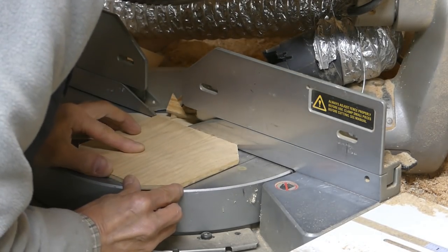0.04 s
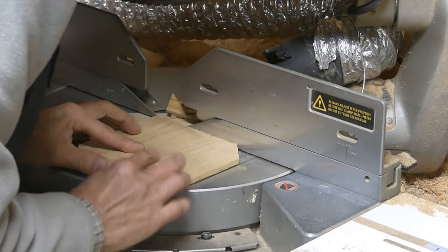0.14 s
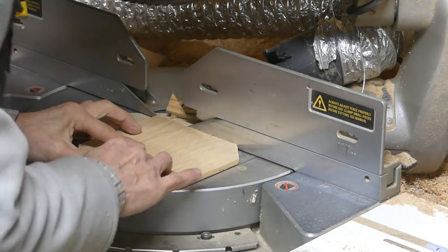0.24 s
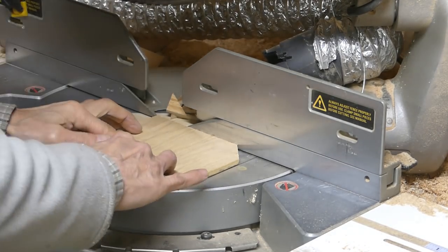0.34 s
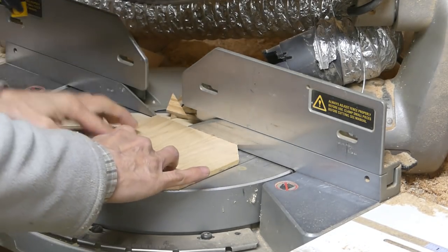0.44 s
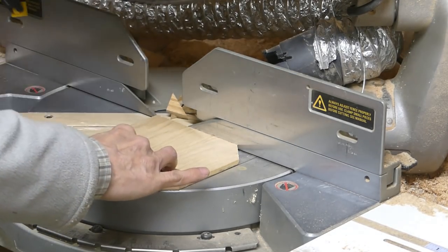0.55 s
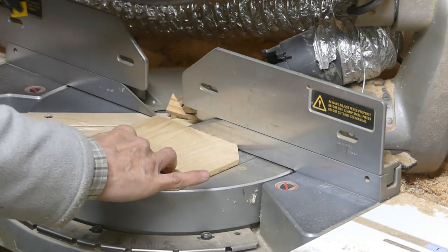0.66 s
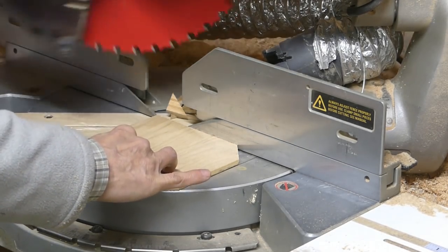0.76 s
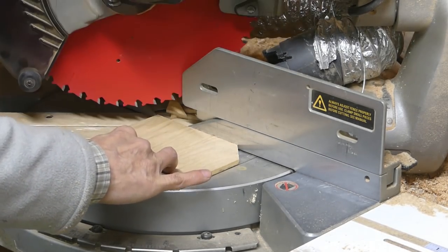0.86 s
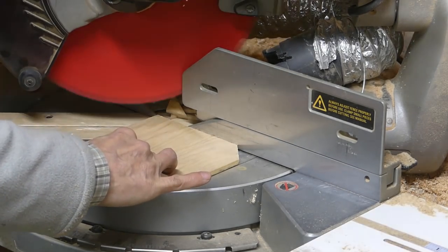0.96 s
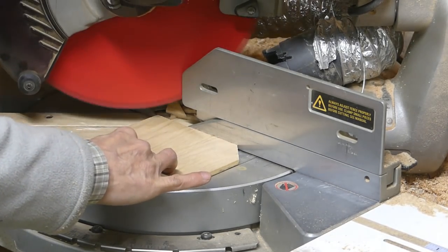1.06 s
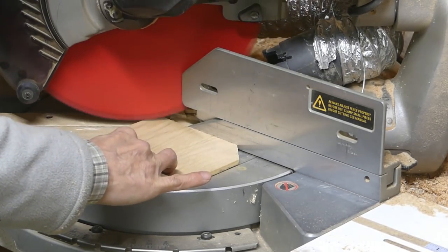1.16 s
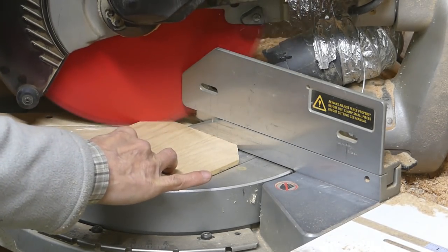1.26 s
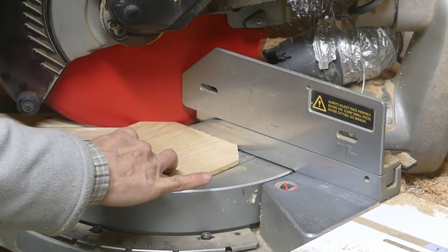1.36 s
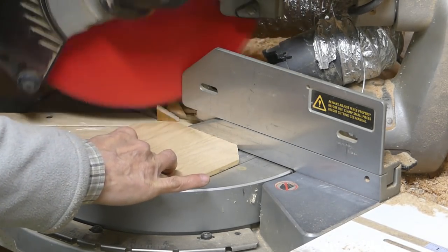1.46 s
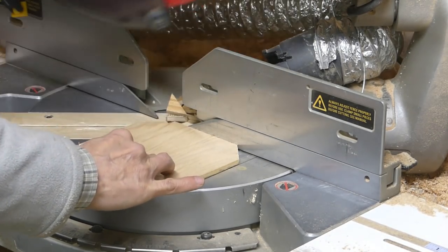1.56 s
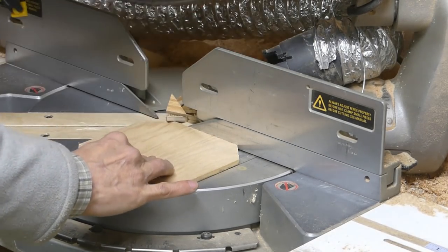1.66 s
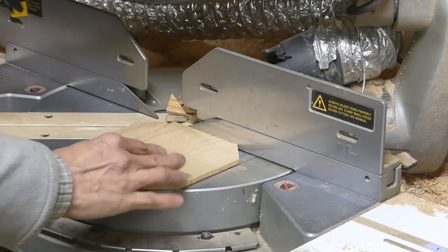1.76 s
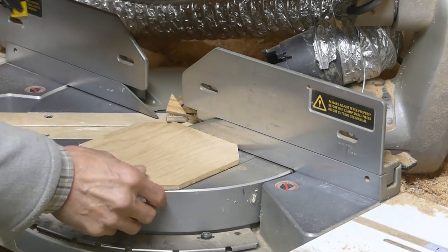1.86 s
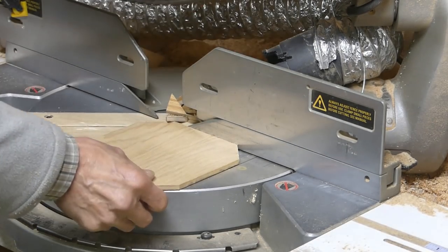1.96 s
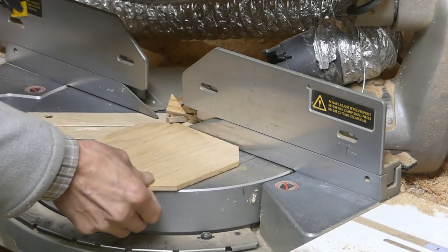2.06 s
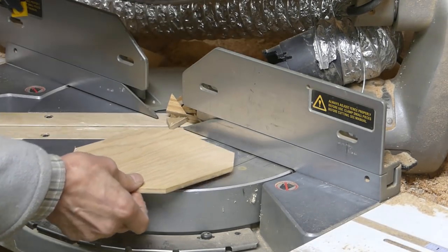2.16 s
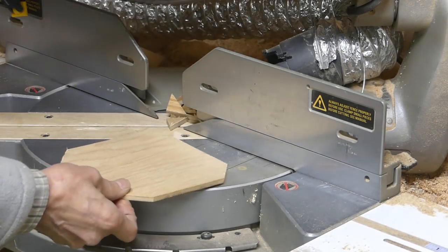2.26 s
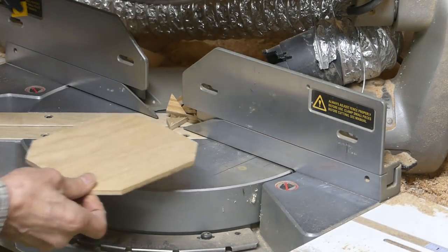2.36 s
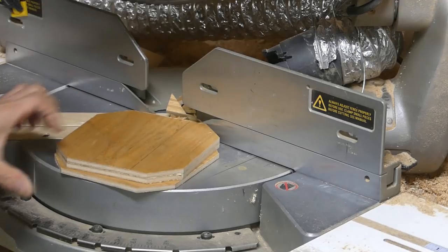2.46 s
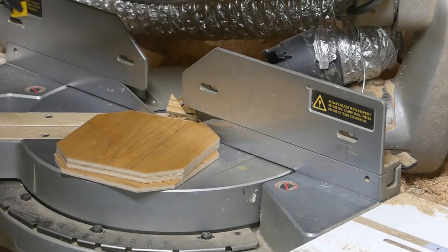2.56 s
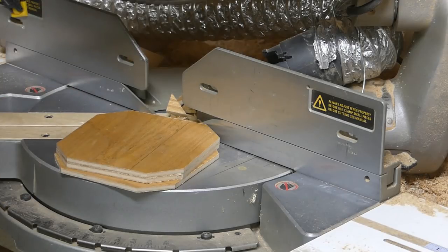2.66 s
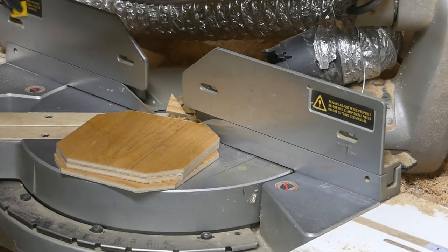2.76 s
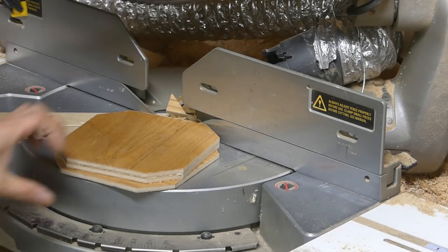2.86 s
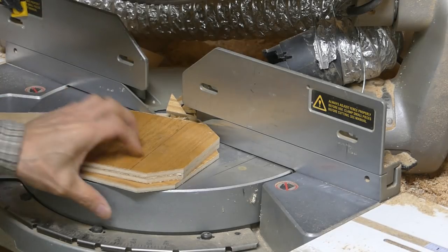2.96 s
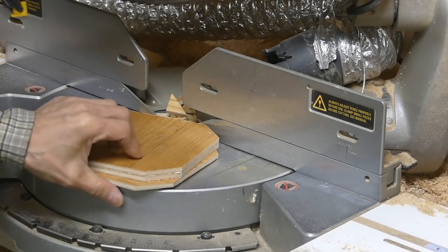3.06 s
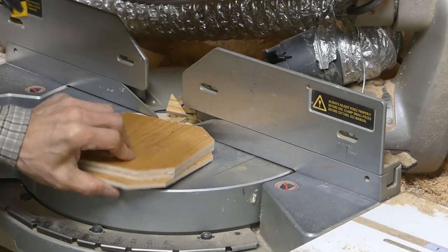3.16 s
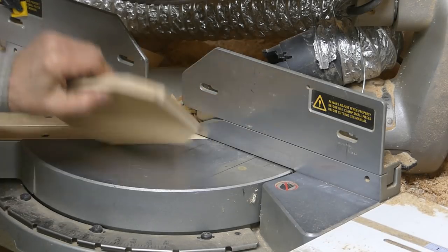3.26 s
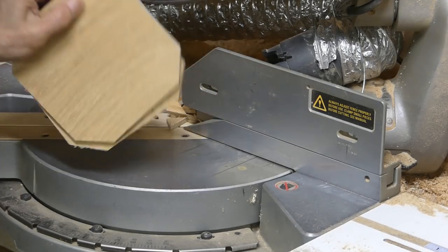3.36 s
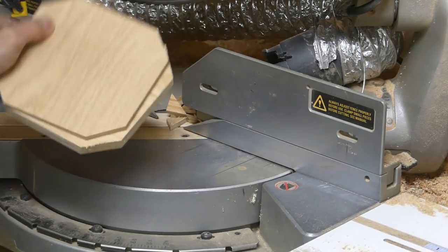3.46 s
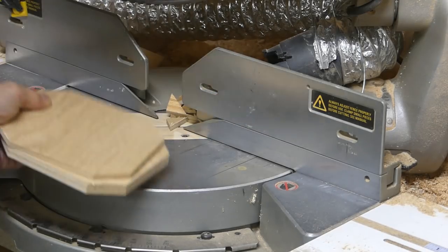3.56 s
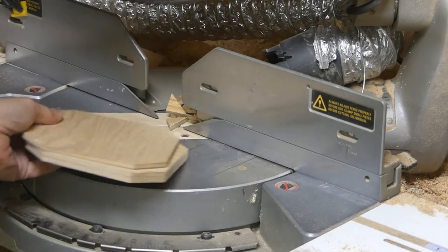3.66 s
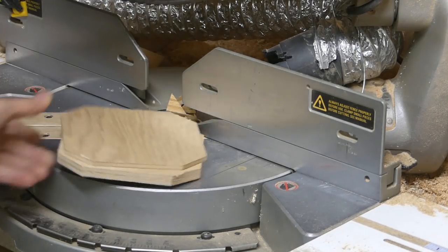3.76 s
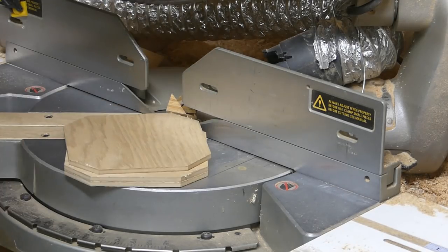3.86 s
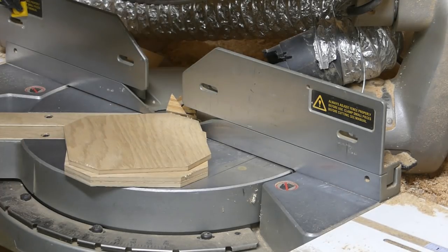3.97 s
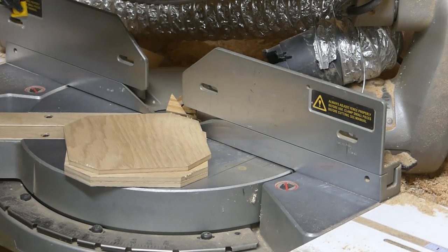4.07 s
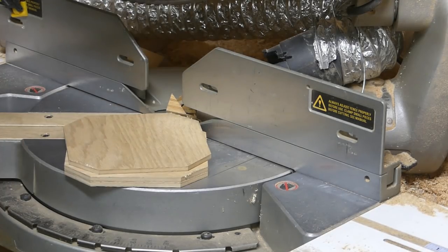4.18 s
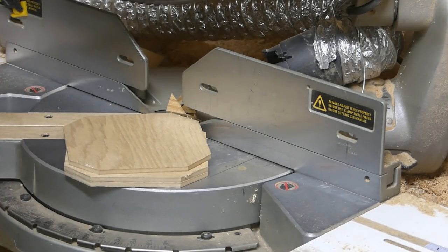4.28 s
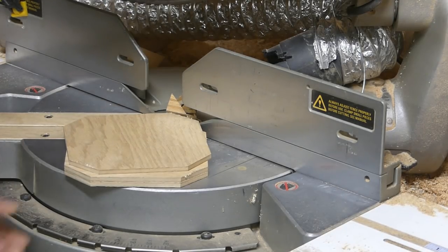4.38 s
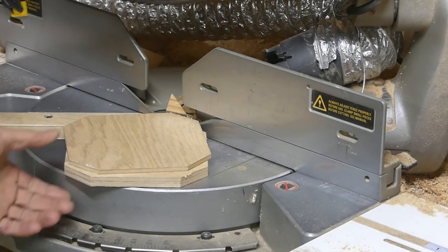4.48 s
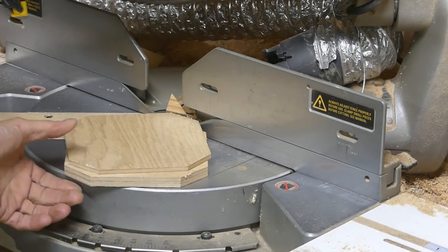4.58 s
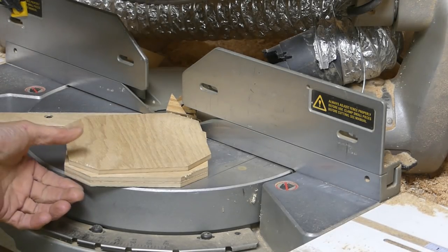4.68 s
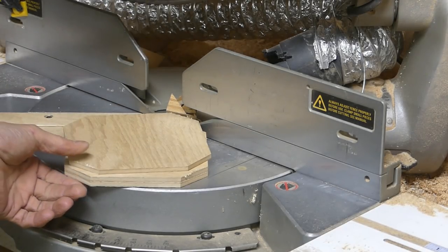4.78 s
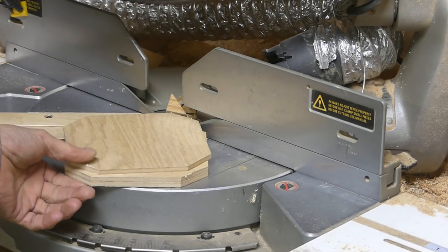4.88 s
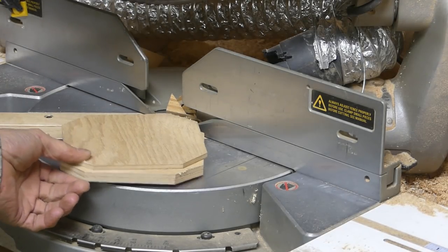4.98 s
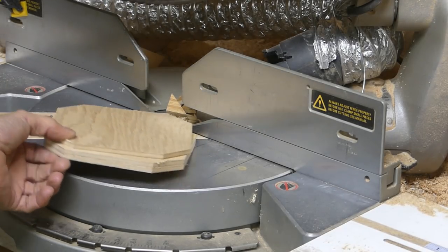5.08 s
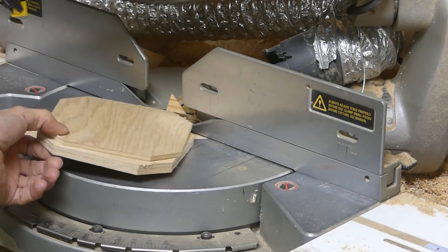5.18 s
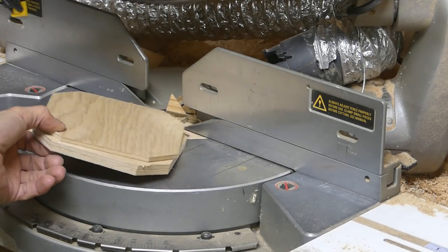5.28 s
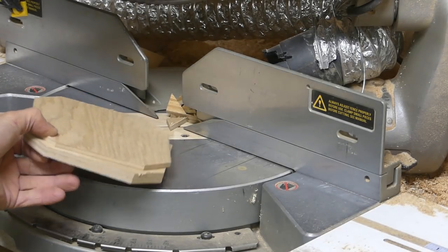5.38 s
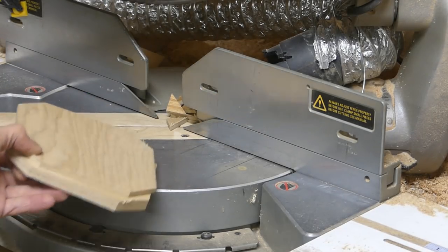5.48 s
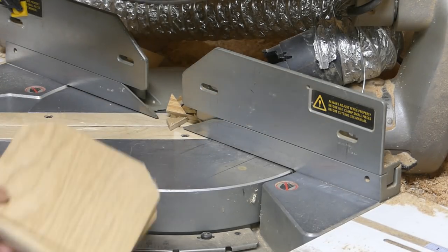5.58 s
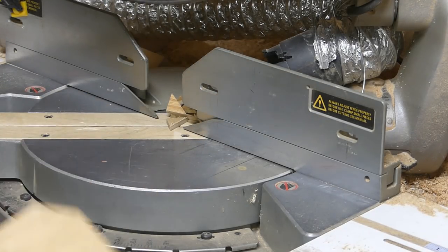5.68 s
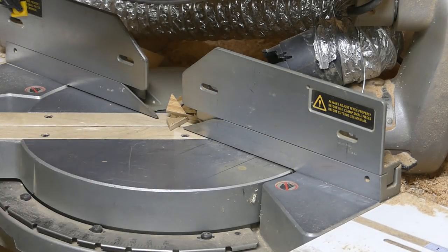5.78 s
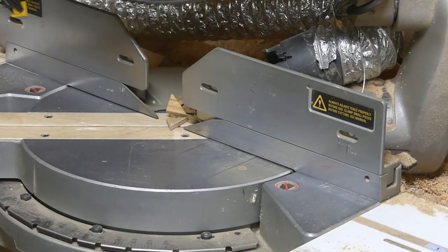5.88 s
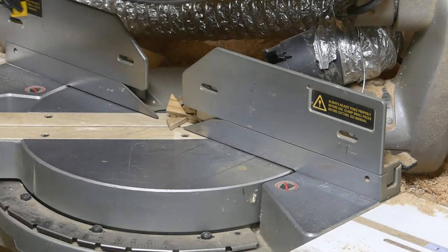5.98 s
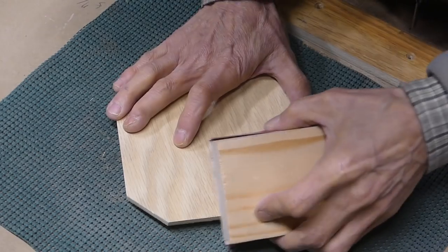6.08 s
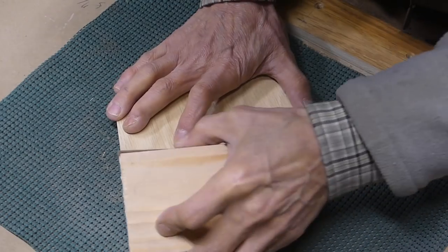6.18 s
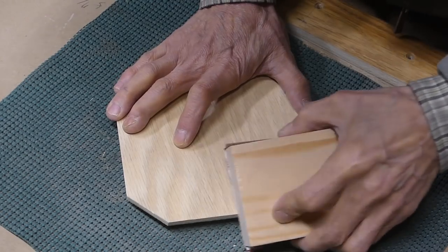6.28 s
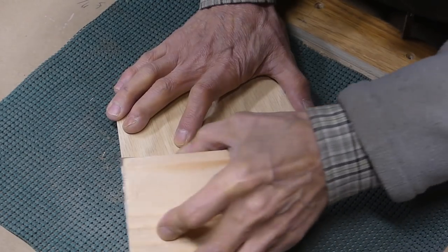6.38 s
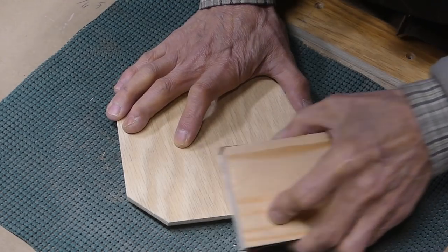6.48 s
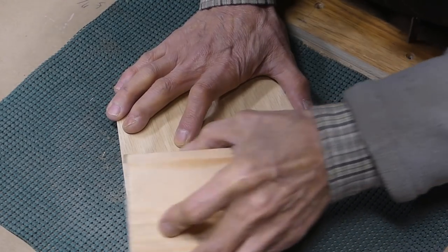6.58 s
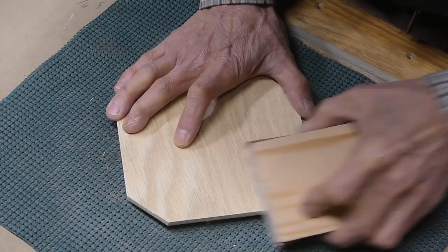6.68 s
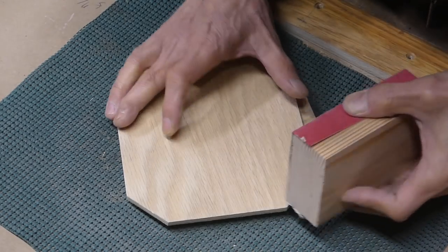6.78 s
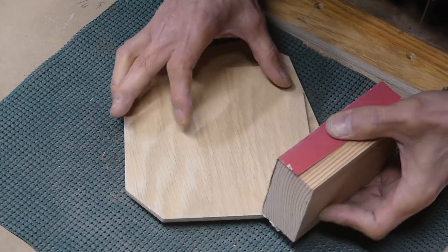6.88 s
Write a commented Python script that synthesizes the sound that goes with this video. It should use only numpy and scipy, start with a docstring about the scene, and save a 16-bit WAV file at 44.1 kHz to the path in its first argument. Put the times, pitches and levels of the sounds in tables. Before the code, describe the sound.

Close in a small workshop, a miter saw whines steadily beside a rushing extractor, then chews a plywood corner with gritty chip noise, a climbing and falling whistle and brief squeals. It lifts and breaks off abruptly. Panels clack onto the metal table, one scrapes, more knock down sharply. Quiet handling follows, then a soft thud and six fast, dry sanding strokes.

```python
"""A miter saw whines (shaft orders) beside its extractor (coloured noise and duct hums), cuts a plywood
panel's corner (grainy chip noise, depth-tuned whistle, squeals) and lifts; its sound breaks off.
Panels drop and slide on the saw's metal table: noise bursts, decaying modes and rough drag noise.
Last, a sanding block rubs a panel's edge in six quick strokes of grainy noise.
Soft brushes of hands on wood and the noise of an idle workshop lie beneath."""
import sys
import numpy as np
from scipy import signal
from scipy.fft import rfft, irfft, next_fast_len
from scipy.io import wavfile
from scipy.ndimage import uniform_filter1d, map_coordinates

SR = 44100
rng = np.random.default_rng(int(sys.argv[2]) if len(sys.argv) > 2 else 0)


def transcribe(signal):
    """Save signal, clipped to [-1, 1], as a 16-bit WAV file at the path in sys.argv[1]."""
    frames = np.atleast_2d(signal).T
    limited = np.clip(frames, -1, 1)
    pcm = np.round(limited * 32767).astype(np.int16)
    wavfile.write(sys.argv[1], SR, pcm)


N = 306054
TOP_HZ = 15800

# idle workshop spectrum: hz, relative_db_per_hz
QUIET_SPECTRUM = [(25, -32), (50, -22), (85, -12.5), (160, -6), (300, -7), (480, -8.5), (750, -8.5),
                  (1300, -9.5), (1900, -16), (2500, -23), (4500, -26), (7500, -28), (10500, -27),
                  (15800, -34)]
# left-right correlation of diffuse sound: hz, correlation
STEREO_LIKENESS = [(30, 0.18), (70, 0.25), (130, 0.48), (500, 0.61), (1000, 0.69), (2500, 0.74),
                   (12000, 0.83)]
# wall reverberation: hz, t60_s
WALLS = [(100, 0.88), (400, 0.48), (1500, 0.38), (4000, 0.37), (8000, 0.3), (14000, 0.3)]

# hand and sleeve brushing wood: centre_s, sigma_s, level_db
BRUSHES = [(3.057, 0.022, -54.5), (3.152, 0.023, -50.5), (3.812, 0.081, -43.5), (4.047, 0.048, -55),
           (5.073, 0.015, -58), (5.4, 0.045, -50), (5.521, 0.042, -49), (5.96, 0.02, -49),
           (6.046, 0.028, -47), (6.927, 0.033, -54.5)]
# panel dragged over the table: fastest_s, level_db
DRAGS = [(3.308, -26.5), (5.089, -47)]
# dragged wood spectrum: hz, relative_db_per_hz
SCRAPE_SPECTRUM = [(100, -19), (450, -13.5), (800, 0.5), (1300, 2.5), (2000, -2), (3500, -8), (6000, -11),
                   (11000, -18.5), (15800, -30)]
DRAG_RISE_DB_PER_S, DRAG_FALL_DB_PER_S = 300, 295

# panel put down on the mat, then its corner bumped by the block: start_s, level_db
THUDS = [(6.006, -29), (6.672, -46)]
# modes of the panel damped by a rubber mat: hz, relative_db, t60_s
MAT_MODES = [(162, -4, 0.12), (198, 4, 0.13), (236, 0, 0.12), (285, 0.5, 0.13)]
TICK_S = 6.865

# sanding strokes: centre_s, half_length_s (scaled per layer), rasp_db
STROKES = [(6.19, 0.039, -28), (6.31, 0.028, -26.5), (6.414, 0.031, -25), (6.522, .036, -25),
           (6.626, 0.026, -26), (6.718, 0.037, -24.5)]
# abrasive grit spectrum: hz, relative_db_per_hz
GRIT_SPECTRUM = [(100, -53), (500, -21), (1000, -13), (1500, -10), (2300, -3), (3000, 3), (3800, -1),
                 (5000, 0), (7000, -3.5), (9500, -6), (13000, -10), (15800, -16)]
# hollow scrape spectrum: hz, relative_db_per_hz
HOLLOW_SPECTRUM = [(80, -51), (230, -3), (400, -10), (800, -1.5), (1400, 0.5), (2000, 3), (4000, -32),
                   (15800, -43)]
# hollow level relative to the rasp; fades as the block moves out to the corner
HOLLOW_DB, HOLLOW_FADE_DB_PER_S = -10.5, 41

# wood meeting the table: start_s, clack_db, table_db, panel_ring_db, panel_pitch_ratio
KNOCKS = [(2.4887, -10.5, -21, -23, 0.95), (2.4964, -17, -18, -22, 1), (3.311, -20.5, -36, -38.5, 1),
          (3.6558, -19, -32, -34, 0.93), (3.7391, -17.5, -31.5, -38, 1), (3.746, -16.5, -43, -34, 0.91),
          (3.8431, -13, -20, -25, 1.08), (3.8495, -5.5, -19.5, -32, 1.46), (3.868, -40, -24, -28, 1.8),
          (3.917, -32, -24, -32.5, 1.46), (4.578, -53, -46, -53, 0.9), (4.903, -62, -52, -55, 0.9)]
# panel modes: hz (before pitch ratio), relative_db, t60_s
PANEL_MODES = [(237, -4, 0.25), (270.2, -6.5, 0.33), (375.5, 0, 0.39), (446, -3, 0.31), (563, -14, 0.081),
               (664, -16.5, 0.75), (874, -17, 0.075), (1285, -18, 0.1), (1500, -12, 0.41), (1760, -4, 0.09),
               (1930, -2, 0.15)]
# contact clack spectrum: hz, relative_db_per_hz
CLACK_SPECTRUM = [(100, -6), (400, -39), (900, 0), (1500, 2), (2400, 4), (4000, 1.5), (6500, -6),
                  (10000, -7), (15800, -17)]
# table's crowded low modes as a spectrum: hz, relative_db_per_hz
TABLE_SPECTRUM = [(40, -30), (120, -10.5), (250, -2), (400, 3), (700, -1), (1100, -1), (2000, -11.5),
                  (6000, -57)]
# treble edge of a 0 dB clack; weaker blows are duller
CONTACT_HZ, BRIGHTEN_DB_PER_OCTAVE = 7500, 19

# extractor duct tones: hz, relative_db, width_hz
DUCT_TONES = [(557, -38.5, 43), (622.6, -33.5, 24), (802, -39, 16), (873, -40.5, 25), (1393, -36, 25)]
# fan and extractor rush spectrum: hz, relative_db_per_hz
RUSH_SPECTRUM = [(30, -42), (90, -49), (170, -15), (245, -7.5), (320, -7.5), (450, -1.5), (620, 0),
                 (1000, 3.5), (1400, 4.5), (1750, -6), (2050, -1), (2800, -6.5), (5000, -21), (15000, -45)]
# spinning teeth hiss spectrum: hz, relative_db_per_hz
HISS_SPECTRUM = [(500, -42), (2000, -19), (3200, 6.5), (4700, -1), (7000, 2.5), (9300, 2.5), (12500, -1),
                 (15800, -7)]
# blade resonances: hz, width_hz, relative_db
BLADE_MODES = [(5670, 190, 1), (8950, 260, -17), (9390, 360, 2), (10730, 370, -0.5), (11520, 300, -1),
               (13080, 220, -8)]
# chip spectrum: hz, relative_db_per_hz
CHIP_SPECTRUM = [(40, -44), (130, -56), (300, -11.5), (600, -6), (1200, 4.5), (2200, 4.5), (4000, 1),
                 (6500, -1), (9000, -11), (11500, -7), (14000, -5.5), (15800, -9)]
# teeth catching on an edge or loose chip: centre_s, sigma_s, level_db
CATCHES = [(0.848, 0.023, -24.5), (1.006, 0.0033, -17), (1.077, 0.016, -23), (1.662, .012, -20),
           (1.834, 0.01, -33)]
# blade squeals: centre_s, sigma_s, pitch_hz, level_db, overtone_step_db
SQUEALS = [(1.298, 0.014, 3760, -22, -0.5), (1.334, 0.01, 3910, -30, 3.5), (1.5, 0.056, 1146, -27.5, -30),
           (1.668, 0.0052, 1197, -13.5, -27), (1.881, 0.17, 11030, -36.5, -57),
           (2.33, 0.0026, 6110, -24.5, -4), (2.375, 0.011, 2046, -26, -26), (2.459, 0.018, 1203, -21, -18)]
# motor harmonics: shaft_rate_multiple, relative_db
SHAFT_ORDERS = [(1, -24.5), (2, -16), (3, 0.5), (4, -12.5), (5, -11), (6, -0.5), (7, -18.5), (8, -18),
                (9, -25.5), (10, -19.5), (13, -21), (15, -23), (33, -24), (36, -21.5), (54, -19)]
# blade in the panel: time_s, depth_0_to_1
DEPTH = [(0.97, 0.01), (1.05, 0.21), (1.18, 0.61), (1.4, 0.94), (1.55, 1), (1.66, .55), (1.82, 0.14),
         (1.97, 0.02)]
# running machine level, dipping in the cut: time_s, relative_db
DIP = [(0.99, -2.5), (1.15, -15), (1.23, -13.5), (1.3, -30), (1.43, -18), (1.68, -20), (1.84, -10.5),
       (2.3, -6)]
IDLE_TURNS_PER_S, SAG_TURNS_PER_S, BRAKE_TURNS_PER_S2 = 242.2, 8, 335  # sag at full depth
CUT_START_S, CUT_END_S, TRIGGER_OFF_S, STOP_S = 0.99, 1.693, 2.33, 2.472
# slot resonance
CAVITY_HZ, CAVITY_WIDTH_HZ, CAVITY_DB = 1821, 130, 9.5


def amp(db):
    """Decibels to gain."""
    return 10 ** (np.asarray(db) / 20)


def unit(x):
    """Scaled to rms 1."""
    return x / np.sqrt(np.mean(x ** 2) + 1e-20)


def clock():
    """Time of every sample, s."""
    return np.arange(N) / SR


def since(s):
    """Seconds after time s, zero before it."""
    return np.maximum(clock() - s, 0)


def until(s):
    """Seconds left before time s, zero after it."""
    return np.maximum(s - clock(), 0)


def swell(s, sigma_s):
    """Gaussian rise and fall."""
    return np.exp(-.5 * ((clock() - s) / sigma_s) ** 2)


def along(points, hz):
    """(Hz, value) points interpolated on a log axis."""
    f, v = np.transpose(points)
    return np.interp(np.log(hz + 1), np.log(f + 1), v)


def curve(rows):
    """(s, value) rows interpolated to every sample."""
    s, value = np.transpose(rows)
    return np.interp(clock(), s, value)


def wobble(rate_hz):
    """Smooth random curve, rate_hz knots a second."""
    knots = rng.standard_normal(16384)
    return map_coordinates(knots, [clock() * rate_hz], mode="wrap")


def phase_of(hz):
    """Running phase of a frequency curve, rad."""
    return 2 * np.pi * np.cumsum(hz) / SR


def fuzzy(phase, width_hz):
    """Narrow noise band around a tone, from random quadrature amplitudes."""
    return unit(wobble(width_hz) * np.sin(phase) + wobble(width_hz) * np.cos(phase))


def airy(phase, share):
    """Noise band following a pitch, its width a fixed share of that pitch."""
    cycles = phase / (2 * np.pi)

    def part():
        return map_coordinates(rng.standard_normal(16384), [cycles * share], mode="wrap")

    return unit(part() * np.sin(phase) + part() * np.cos(phase))


def filtered(x, response):
    """x times a response of frequency, zero-padded."""
    n = x.shape[-1]
    m = next_fast_len(n + 8192)
    return irfft(rfft(x, m) * response(np.fft.rfftfreq(m, 1 / SR)), m)[..., :n]


def spread(pair):
    """Mix two unrelated signals into partly correlated left and right."""
    def mid_side_gains(hz):
        turn = np.arccos(np.clip(along(STEREO_LIKENESS, hz), 0, 1)) / 2
        return np.array([np.cos(turn), np.sin(turn)])

    mid, side = filtered(pair, mid_side_gains)
    return np.array([mid + side, mid - side])


def noise(spectrum, grain=1):
    """Stereo noise of rms 1; grain roughens it before it takes its colour."""
    rough = grain * rng.standard_normal((2, N))
    return unit(spread(filtered(rough, lambda hz: amp(along(spectrum, hz)))))


def add(track, s, sound):
    """Lay a sound into a track at time s."""
    part = track[..., round(s * SR):][..., :sound.shape[-1]]
    part += sound[..., :part.shape[-1]]


def without_bass(x, low_hz):
    """Second-order high-pass."""
    return signal.sosfilt(signal.butter(2, low_hz, "high", fs=SR, output="sos"), x)


def nearby(x, echo_db, reach_s=.012, count=8):
    """Fence, hood and bench return early echoes that comb the spectrum."""
    out = x.copy()
    delays_s = rng.uniform(reach_s / 20, reach_s, count)
    for delay_s, sign in zip(delays_s, rng.choice([-1, 1], count)):
        add(out, delay_s, sign * amp(echo_db) * x)
    return out / np.sqrt(1 + count * amp(echo_db) ** 2)


def workshop(x, wet_db):
    """Add the walls' answer, a decaying noise tail whose treble dies first."""
    hz, t, z = signal.stft(rng.standard_normal((2, SR * 3 // 4)), SR, nperseg=256)
    decay = amp(-60 * t / along(WALLS, hz)[:, None])
    tail = spread(signal.istft(z * decay, SR, nperseg=256)[1])
    tail = np.pad(tail / np.linalg.norm(tail[0]), ((0, 0), (100, 0)))
    wet = signal.fftconvolve(np.atleast_2d(x), tail, axes=1)[:, :x.shape[-1]]
    return x + amp(wet_db) * wet


def struck(colour, envelope, wet_db):
    """Noise burst of one colour, and the walls' smooth answer in the same colour."""
    direct = unit(filtered(rng.standard_normal(len(envelope)), colour)) * envelope
    click = signal.unit_impulse(len(envelope))
    tail = unit(filtered(workshop(click, 0) - click, colour))
    return direct + amp(wet_db) * np.std(direct) * tail


def quiet(level_db=-51.5):
    """Idle workshop: steady coloured noise."""
    return amp(level_db) * noise(QUIET_SPECTRUM)


def handling():
    """Wood drags as rough noise that gathers and loses speed; hands brush as soft swells."""
    slide = sum(amp(db - DRAG_RISE_DB_PER_S * until(s) - DRAG_FALL_DB_PER_S * since(s)) for s, db in DRAGS)
    drag = slide * noise(SCRAPE_SPECTRUM, amp(1.5 * wobble(830)))
    brush_level = sum(amp(db) * swell(s, sigma_s) for s, sigma_s, db in BRUSHES)
    brush = brush_level * noise(GRIT_SPECTRUM, amp(1.2 * wobble(300)))
    return workshop(nearby(drag, echo_db=-11), wet_db=-7.5) + brush


def bench(thud_attack_s=0.0037, low_hz=130, tick_db=-37, tick_t60_s=0.026):
    """Decaying modes thud on the mat, with little deep bass; later a grain snaps as bright noise."""
    out, t = np.zeros((2, N)), np.arange(SR // 4) / SR
    thud = sum(amp(db - 60 * t / t60_s) * np.sin(2 * np.pi * hz * t) for hz, db, t60_s in MAT_MODES)
    for s, db in THUDS:
        add(out, s, amp(db) * thud * (1 - np.exp(-t / thud_attack_s)))
    snap = unit(filtered(rng.standard_normal(len(t)), lambda hz: hz > 6000))
    add(out, TICK_S, amp(tick_db - 60 * t / tick_t60_s) * snap)
    return without_bass(out, low_hz)


def sanding(grit_db=0.5, catch_db=1.4, hollow_grain_db=4.7, ripple_db=2):
    """Grains catch on the edge as rough noise; random spectral ripple gives each stroke new resonances."""
    out = np.zeros((2, N))
    grid_hz = np.geomspace(200, TOP_HZ, 70)
    rasp = noise(GRIT_SPECTRUM, amp(grit_db * wobble(2500) + catch_db * wobble(160)))
    scrape = noise(HOLLOW_SPECTRUM, amp(hollow_grain_db * wobble(400)))
    for s, half_s, rasp_db in STROKES:
        scrape_db = rasp_db + HOLLOW_DB - HOLLOW_FADE_DB_PER_S * (s - STROKES[0][0])
        stroke = swell(s, half_s * 0.77) * amp(rasp_db) * rasp
        stroke += swell(s, half_s * 0.96) * amp(scrape_db) * scrape
        start_s = s - 1 / 5
        excerpt = stroke[:, round(start_s * SR):][:, :SR // 2]
        ripple = np.column_stack([grid_hz, ripple_db * rng.standard_normal(len(grid_hz))])
        add(out, start_s, filtered(excerpt, lambda hz: amp(along(ripple, hz) - 1.0)))
    return workshop(out, wet_db=-13.5)


def knocks(crack_t60_s=0.0084, chatter_db=-15, chatter_t60_s=0.12, table_t60_s=0.093,
           scatter_db=1, low_hz=110, contact_s=0.0003):
    """Each contact cracks and chatters as noise, and rings the table's and panel's modes."""
    out, t = np.zeros((2, N)), np.arange(SR * 3 // 4) / SR

    def fade(t60_s):
        return 1000 ** (-t / t60_s) * (1 - np.exp(-t / contact_s))

    clack_fade = fade(crack_t60_s) + amp(chatter_db) * fade(chatter_t60_s)
    for s, clack_db, table_db, ring_db, pitch in KNOCKS:
        # soft contact dulls the clack
        soft_hz = CONTACT_HZ * 2 ** (clack_db / BRIGHTEN_DB_PER_OCTAVE)
        colour = lambda hz: amp(along(CLACK_SPECTRUM, hz)) / np.hypot(1, (hz / soft_hz) ** 2)
        clack = amp(clack_db) * struck(colour, clack_fade, wet_db=0.0)
        table_colour = lambda hz: amp(along(TABLE_SPECTRUM, hz))
        table = amp(table_db) * struck(table_colour, fade(table_t60_s), wet_db=2.5)
        ring = np.zeros(len(t))
        for hz, db, t60_s in PANEL_MODES:
            mode = np.sin(2 * np.pi * (hz * pitch * t + rng.random()))
            ring += amp(db + scatter_db * rng.normal()) * fade(t60_s) * mode
        add(out, s, clack + table + workshop(amp(ring_db) * ring, wet_db=-14.5))
    return without_bass(out, low_hz)  # small panels radiate little bass


def shaft_speed():
    """Turns/s: the motor sags as the blade sinks, and brakes when the trigger is let go."""
    sag = SAG_TURNS_PER_S * curve(DEPTH)
    return IDLE_TURNS_PER_S - sag - BRAKE_TURNS_PER_S2 * np.minimum(since(TRIGGER_OFF_S), .5)


def airflow(rush_db=-24.0, hiss_db=-31.0, plate_db=-34.5, duct_db=0.5, rush_dip=0.61, teeth_dip=0.58,
            depth_db=14, coast_db_per_s=25):
    """Fan and extractor rush, ducts hum; spinning teeth hiss and ring the blade, boosted by depth."""
    dip_db = curve(DIP)
    air_db = rush_dip * dip_db
    teeth_db = teeth_dip * dip_db + depth_db * curve(DEPTH) - coast_db_per_s * since(TRIGGER_OFF_S)
    rush = amp(air_db + rush_db + 1.04 * wobble(25.6)) * noise(RUSH_SPECTRUM)
    duct = sum(amp(db) * fuzzy(2 * np.pi * hz * clock(), width_hz) for hz, db, width_hz in DUCT_TONES)

    def modes(f):
        return sum(amp(db) * 1j * f * w / (c * c - f * f + 1j * f * w) for c, w, db in BLADE_MODES)

    blade = amp(hiss_db) * noise(HISS_SPECTRUM)
    blade += amp(plate_db) * unit(filtered(noise(HISS_SPECTRUM), modes))
    return nearby(rush + amp(teeth_db) * blade, echo_db=-16.0) + amp(air_db + duct_db) * duct


def chips(cut_db=-19.5, cut_dip=.2, attack_db_per_s=1800, release_db_per_s=250, dust_db=-27,
          clear_db_per_s=13, turn_hz=72, runout_db=-0.9, chip_db=3):
    """Teeth tear chips as grainy noise pulsing at turn_hz; sawdust rattles on and clears after the cut."""
    tearing = amp(cut_db + cut_dip * curve(DIP) - release_db_per_s * since(CUT_END_S))
    dust = amp(dust_db - clear_db_per_s * since(CUT_END_S))
    level = np.maximum(tearing, dust) * amp(-attack_db_per_s * until(CUT_START_S))
    catches = sum(amp(db) * swell(s, sigma_s) for s, sigma_s, db in CATCHES)
    level = np.hypot(level, catches)
    grain = amp(runout_db * np.sin(2 * np.pi * turn_hz * clock()) + chip_db * wobble(1500))
    uneven = amp(wobble(35))
    return nearby(level * uneven * noise(CHIP_SPECTRUM, grain), echo_db=-13.0)


def whistle(shallow_hz=1400, deep_hz=4730, level_db=-29, feed_db=0.4, skirt_db=0, octave_db=-11,
            third_db=-13, full_depth=0.14, lead_in_s=0.079):
    """Air whistles through the teeth: higher and more turbulent when deep, weaker as the blade lifts."""
    depth = curve(DEPTH)
    pitch_hz = shallow_hz + (deep_hz - shallow_hz) * depth
    phase = phase_of(pitch_hz)
    core, skirt = airy(phase, .08), airy(phase, .28)
    octave, third = airy(2 * phase, .06), airy(3 * phase, .05)
    flicker = unit(amp(2.6 * wobble(70)))
    lead_in = np.minimum(since(CUT_START_S) / lead_in_s, 1) ** 2
    in_kerf = np.sqrt(np.clip(depth / full_depth, 0, 1)) * lead_in
    feed_per_s = uniform_filter1d(np.gradient(depth) * SR, size=SR // 10)
    # flares as the pitch passes the slot resonance
    flare_db = CAVITY_DB / (1 + ((pitch_hz - CAVITY_HZ) / CAVITY_WIDTH_HZ) ** 2)
    turbulence = pitch_hz / deep_hz * (amp(skirt_db) * skirt + amp(third_db) * third)
    level = amp(level_db + feed_db * feed_per_s + flare_db) * in_kerf
    return level * (flicker * core + amp(octave_db) * octave + turbulence)


def squeals(waver=0.015):
    """The blade rings briefly, wavering, with overtones; pitch rides on shaft speed."""
    out, speed = np.zeros(N), shaft_speed()
    for s, sigma_s, hz, db, overtone_db in SQUEALS:
        phase = phase_of(hz * speed / speed[round(s * SR)] * (1 + waver * wobble(150)))
        for k in range(3):
            if (k + 1) * hz < TOP_HZ:
                out += amp(db + k * overtone_db) * swell(s, sigma_s) * np.sin((k + 1) * phase)
    return out


def cut(load_db=-39):
    """Chips, whistle and squeals; the frame hums at the shaft rate as the motor takes up the load."""
    hum = amp(load_db) * swell(1.106, 0.074) * fuzzy(phase_of(shaft_speed()), 29.2)
    return chips() + workshop(whistle() + squeals(), wet_db=-7) + hum


def motor(whine_db=-21.5, coast_db_per_s=130, flutter_db=0.64, rough=0.2, side=0.029, drift=0.0016):
    """Shaft orders, each fluttering on its own, with a skirt of turbulence."""
    shaft = phase_of(shaft_speed() * (1 + drift * wobble(12)))
    out = np.zeros((2, N))
    for order, db in SHAFT_ORDERS:
        phase = order * shaft + rng.uniform(0, 2 * np.pi)
        tone = np.sqrt(2) * np.sin(phase) * amp(flutter_db * wobble(25.17))
        tone += rough * fuzzy(phase, 70)
        stereo = np.outer([1, -1], side * np.cos(phase + rng.uniform(0, 2 * np.pi)))
        out += amp(db) * (tone + stereo)
    return out * amp(whine_db + curve(DIP) - coast_db_per_s * since(TRIGGER_OFF_S))


def saw(stop_db=-8, stop_t60_s=0.4):
    """Whole machine with extractor; at STOP_S it breaks off, leaving a short tail."""
    stop = amp(stop_db * (clock() > STOP_S) - 60 * since(STOP_S) / stop_t60_s)
    return (motor() + airflow() + cut()) * stop


def scene():
    """Saw, handling and sanding, a little right of centre, over the quiet workshop."""
    sources = saw() + knocks() + handling() + sanding() + bench()
    return sources * amp([[-.25], [.25]]) + quiet()


def record(dry):
    """Clip at full scale, then remove everything from TOP_HZ up."""
    return filtered(np.clip(dry, -1, 1), lambda hz: hz < TOP_HZ)


dry = scene()
out = record(dry)
transcribe(out)
```